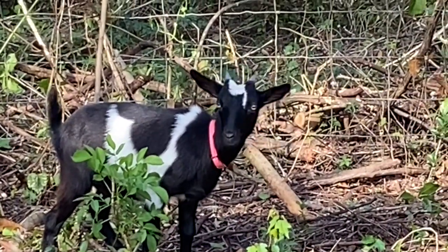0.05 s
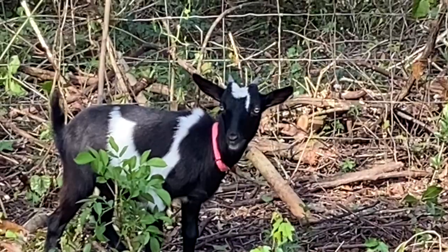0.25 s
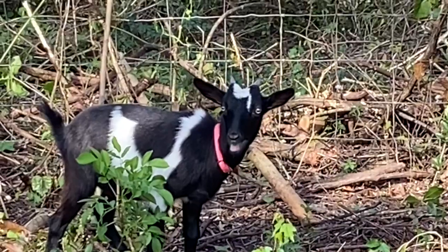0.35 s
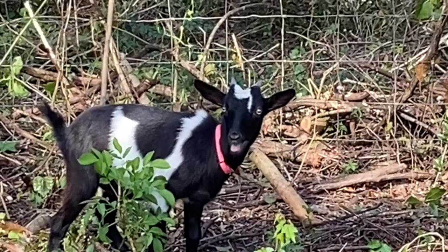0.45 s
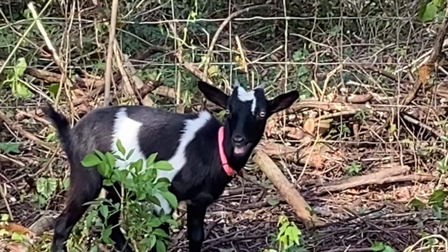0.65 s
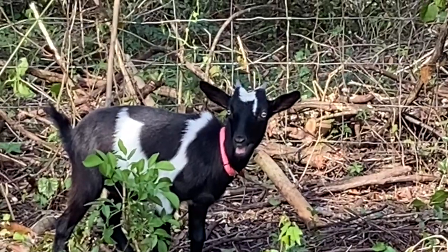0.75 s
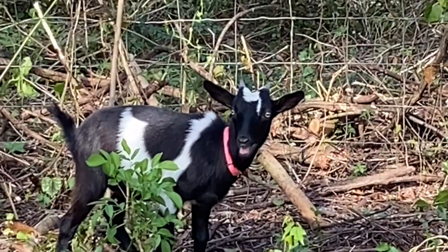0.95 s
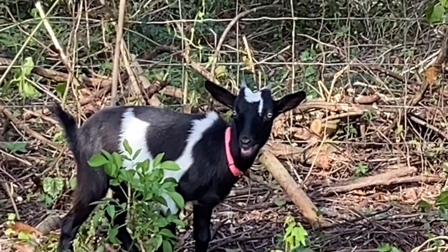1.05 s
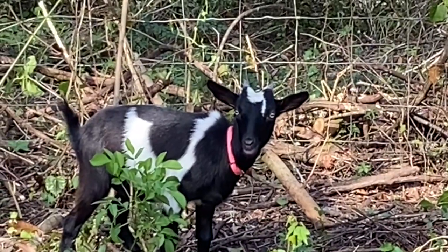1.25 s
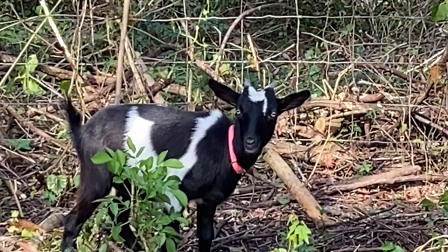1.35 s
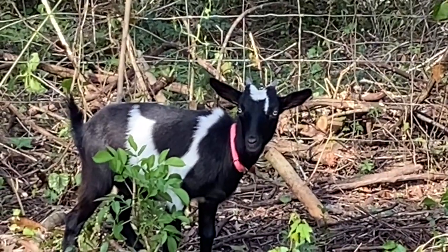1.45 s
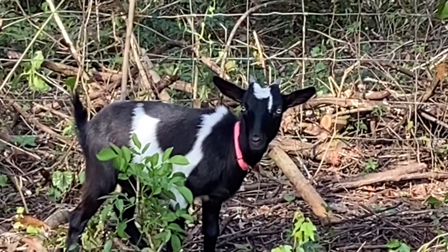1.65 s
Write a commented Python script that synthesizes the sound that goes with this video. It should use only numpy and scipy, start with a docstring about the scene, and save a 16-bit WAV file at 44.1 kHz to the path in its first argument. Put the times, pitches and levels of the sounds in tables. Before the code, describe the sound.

Faint low engine drone, hum and high airy hiss run throughout, the drone slowly rising in pitch. At about 0.2 s a small goat bleats, quickly sliding up to a bright, loud, open cry. From 0.5 s it quavers and rasps, catches lower near 0.7 s, swells again more closed and nasal, and drops away with a husky puff at 1.0 s. Dull faint outdoor echoes linger; a barely audible rustle comes around 1.2 s.

```python
"""Goat bleat outdoors

A small goat gives one long bleat: a bright cry that starts to quaver and rasp, catches, and ends lower
with a narrowed mouth. Fold pulses and chopped air noise drive a moving throat filter. Ground, sticks,
brush and far trees throw it back as delayed copies and noise echoes. Behind it an engine tone slowly
rises over hum and rumble, with a high shaped-noise hiss, thin tones and one faint rustle.
"""
import sys
import numpy as np
from scipy import signal
from scipy.fft import rfft, irfft
from scipy.io import wavfile
from scipy.ndimage import uniform_filter1d

SR = 44100
rng = np.random.default_rng(int(sys.argv[2]) if len(sys.argv) > 2 else 0)


def wav_out(sig):
    """Save sig, one row per channel (or a flat mono array), as 16-bit PCM at SR to the path in sys.argv[1]."""
    wavfile.write(sys.argv[1], SR, np.round(np.clip(np.atleast_2d(sig).T, -1, 1) * 32767).astype(np.int16))


N = 74970
T, HZ = np.arange(N) / SR, np.fft.rfftfreq(N, 1 / SR)
EDGE_HZ = 15900  # top of the band


def amp(db):
    """Decibels to gain."""
    return 10 ** (np.asarray(db) / 20)


def unit(x):
    """Scales to rms 1."""
    return x / np.sqrt(np.mean(x ** 2) + 1e-20)


def curve(table, axis=1):
    """One column of a time table, at every sample."""
    rows = np.array(table)
    return np.interp(T, rows[:, 0], rows[:, axis])


def spectrum(table, hz, axis=1):
    """One column of a frequency table, read on a log axis."""
    rows = np.array(table)
    return np.interp(np.log(hz + 1), np.log(rows[:, 0] + 1), rows[:, axis])


def filtered_noise(source, colour):
    """Shapes a noise source with a colour table."""
    return irfft(rfft(source) * amp(spectrum(colour, HZ)), N)


def noise(colour):
    """Noise of rms 1 with the given colour."""
    return unit(filtered_noise(rng.standard_normal(N), colour))


def wander(rate_hz):
    """Random motion of rms 1, mostly slower than the given rate."""
    return unit(irfft(rfft(rng.standard_normal(N)) / (1 + (HZ / rate_hz) ** 4), N))


def tone(hz):
    """A sine of rms 1 that follows hz, from a random phase."""
    cycles = np.cumsum(hz * np.ones(N)) / SR + rng.random()
    return np.sqrt(2) * np.sin(2 * np.pi * cycles)


def lowpass(hz):
    """Second-order filter that dulls everything above hz."""
    return signal.butter(2, hz, fs=SR, output="sos")


# Distant engine note: start_s, pitch_hz, level_db
ENGINE_NOTE = [(0, 167.5, -25.5), (.25, 170.7, -29), (.38, 174, -32.5), (.9, 178.3, -27),
               (1.7, 189.3, -34.5)]
# Hum under it: pitch_hz, level_db, sway (rms pitch drift in Hz, and rms level change as a share)
ENGINE_HUM = [(50.3, -46.5, 1), (143, -41.5, 0.096)]
# Colour of the low rumble: freq_hz, relative_db_per_hz
RUMBLE_COLOUR = [(20, -57), (52, 0), (95, 4), (175, 2.5), (215, -6.5), (400, -23), (1500, -100)]
RUMBLE_DB = -37.5


def engine():
    """One rising engine note over wavering hum and noise rumble, the same on both sides."""
    note = amp(curve(ENGINE_NOTE, axis=2)) * tone(curve(ENGINE_NOTE))
    note *= 1 + 0.14 * wander(4.8)
    hum = sum(amp(db) * tone(hz + sway * wander(15.0)) * (1 + sway * wander(3.5))
              for hz, db, sway in ENGINE_HUM)
    return note + hum + amp(RUMBLE_DB) * noise(RUMBLE_COLOUR)


# Colour of the hiss: freq_hz, relative_db_per_hz
HISS_COLOUR = [(2600, -12), (3400, -11), (4100, -2.5), (5500, 4.5), (6500, -5), (7400, -19), (8700, 3),
               (12000, -10.5), (13500, -20), (15500, -16)]
# Left-right likeness of the hiss: freq_hz, correlation (-1 to 1)
HISS_LIKENESS = [(3100, 0.69), (7000, -0.21)]
# Thin tones that come and go in it: loudest_s, pitch_hz, peak_level_db
THIN_TONES = [(.08, 4129, -46.5), (1.25, 3817, -51), (1.58, 4402, -47), (1.3, 8804, -49)]
HISS_DB, WHINE_S = -38, .26


def whines():
    """Faint thin tones, each with a bell-shaped swell and a slight random pitch wobble."""
    return sum(amp(db) * np.exp(-((T - s) / WHINE_S) ** 2) * tone(hz + 3 * wander(25.0))
               for s, hz, db in THIN_TONES)


def hiss():
    """Wide, high outdoor hiss: shaped noise partly shared between the sides, plus thin tones."""
    same = np.clip(spectrum(HISS_LIKENESS, HZ), -1, 1)
    left, other = noise(HISS_COLOUR), noise(HISS_COLOUR)
    right = irfft(same * rfft(left) + np.sqrt(1 - same ** 2) * rfft(other), N)
    return amp(HISS_DB) * np.array([left, right]) + np.array([whines(), whines()])


# Colour of the rustle: freq_hz, relative_db_per_hz
RUSTLE_COLOUR = [(800, -11), (1800, 0.5), (3500, -31)]
RUSTLE_S, RUSTLE_LENGTH_S, RUSTLE_DB = 1.228, 0.045, -46.5  # centre, half-width, level of the shared part


def rustle():
    """A faint mid-range rustle: shaped noise, partly separate on each side, that swells briefly."""
    swell = amp(RUSTLE_DB) * np.exp(-((T - RUSTLE_S) / RUSTLE_LENGTH_S) ** 2)
    sides = np.array([noise(RUSTLE_COLOUR), noise(RUSTLE_COLOUR)])
    return swell * (noise(RUSTLE_COLOUR) + .5 * sides)


FAR_DB, FAR_S, FAR_WIDTH_S, FAR_HZ = -36.5, 0.46, 0.063, 1102  # main echo; treble falls above FAR_HZ
WOODS_DB, WOODS_T60 = -35, 1.26  # faint lingering scatter; seconds to fall 60 dB


def far_echo(x):
    """Distant trees return the bleat late, blurred over many random paths, and dull."""
    cluster = amp(FAR_DB) * unit(np.exp(-((T - FAR_S) / FAR_WIDTH_S) ** 2))
    decay = np.exp(-np.log(1000) * T / WOODS_T60)
    linger = amp(WOODS_DB) * unit(decay * np.minimum(T / FAR_S, 1))
    scatter = rng.standard_normal(N) + .5 * rng.standard_normal((2, N))
    paths = np.hypot(cluster, linger) * scatter / np.sqrt(N)
    dull = signal.sosfilt(lowpass(FAR_HZ), x)
    return signal.fftconvolve(dull[None], paths, axes=1)[:, :N]


# The voice between the two microphone ports: freq_hz, left_lead_radians
PORT_LEAD = [(0, 0.5), (1400, 0.2), (2500, .5), (5400, 0.66), (6600, 3), (11000, 6), (15500, 13)]
# Decay of the brush tail: freq_hz, fall_by_60_db_s
BRUSH_DECAY = [(1200, 0.24), (12000, 0.2)]
BRUSH_DB, NEAR_DB, NEAR_S = -18, -7.5, 0.006  # echo gains; the near scatter swells until NEAR_S
SMEAR_S, SMEAR_HZ = 0.0016, 5020  # lag grows with frequency and reaches SMEAR_S at SMEAR_HZ


def outdoors(x):
    """Direct sound at two ports, quick scatter from nearby sticks, and a faint tail from the brush."""
    lead = np.exp(.5j * np.interp(HZ, *np.transpose(PORT_LEAD)))
    smear = np.exp(-1j * np.pi * SMEAR_S * HZ ** 2 / SMEAR_HZ)
    direct = irfft(rfft(x) * smear * np.array([lead, lead.conj()]), N)
    hz, t, grains = signal.stft(rng.standard_normal((2, N)), SR, nperseg=256)
    grains = grains * 1000 ** (-t / spectrum(BRUSH_DECAY, hz)[:, None])
    tail = signal.istft(grains, SR, nperseg=256)[1][:, :N]
    near = rng.standard_normal(N) * T / NEAR_S * np.exp(-T / NEAR_S)
    echoes = (amp(BRUSH_DB) * unit(tail) + amp(NEAR_DB) * unit(near)) / np.sqrt(N)
    return direct + signal.fftconvolve(direct, echoes, axes=1)[:, :N]


GROUND_S, GROUND_SHARE, GROUND_HZ = 0.0021, 0.082, 4780  # delay, gain, treble limit


def ground(x):
    """Soft ground adds a late, inverted, duller copy, so harmonics swell and dip as pitch moves."""
    echo = GROUND_SHARE * np.exp(-2j * np.pi * HZ * GROUND_S) / (1 + (HZ / GROUND_HZ) ** 2)
    return irfft(rfft(x) * (1 - echo), N)


# Colour of the closing puff: freq_hz, relative_db_per_hz
AIR_COLOUR = [(600, -32.5), (900, -9), (1200, 4), (1600, -1.5), (4000, -21)]
FADE_S, AIR_DB, AIR_RISE_S = 0.044, -36.5, 0.018  # the air outlasts the folds


def last_air():
    """A short husky puff of noise rises into the bleat's end and fades as the folds stop."""
    since = T - BLEAT_LINE[-1][0]
    return amp(AIR_DB) * np.exp(-np.maximum(since / FADE_S, -since / AIR_RISE_S)) * noise(AIR_COLOUR)


# Throat colour: freq_hz, mouth_narrow_db, half_open_db, wide_db
THROAT_COLOUR = [(523, -42, -41, -47.5), (740, -31.5, -23.5, -36.5), (1007.5, -17.5, -14.5, -22),
                 (1038, -28, -11, -7.5), (1305, -10, -20.5, -0.5), (1485, -19.5, -9.5, -23),
                 (1598, -30, -22, -42), (1873, -30, -29, -52), (2175, -20.5, -19.5, -37),
                 (2445, -32, -25.5, -21.5), (2733, -34.5, -23.5, -32.5), (3060, -19.5, -11.5, -7.5),
                 (3340, -27.5, -42, -45), (3330, -29, -22, -25), (4360, -26.5, -24, -14),
                 (4930, -26, -33.5, -18.5), (5336, -23.5, -21.5, -10), (5920, -30, -27, -37.5),
                 (6610, -26, -19.5, -20.5), (7400, -56, -76, -59), (8005, -34.5, -28, -36),
                 (11070, -45.5, -43, -33.5), (14400, -55.5, -50, -51)]


def throat(x, axis):
    """Causal (minimum-phase) resonance for one mouth shape."""
    log_gain = np.log(amp(spectrum(THROAT_COLOUR, abs(np.fft.fftfreq(4096, 1 / SR)), axis=axis)))
    ring = np.fft.ifft(np.exp(np.conj(signal.hilbert(log_gain)))).real
    return signal.fftconvolve(x, ring[:len(ring) // 2])[:N]


# Melody of the bleat: start_s, centre_pitch_hz, level_db (before VOICE_DB)
BLEAT_LINE = [(0.185, 353, -41.5), (0.204, 402.4, -40), (0.223, 452.7, -20.5), (0.26, 495.8, -15),
              (0.29, 513.2, -9.5), (0.314, 531.2, -10.5), (0.34, 510, -9), (0.36, 515.2, -9.5),
              (0.378, 533.1, -10.5), (0.405, 507.5, -10), (0.452, 518.6, -11), (0.474, 491.4, -13.5),
              (0.52, 515.3, -12.5), (0.538, 473.2, -16), (0.57, 480, -16), (0.594, 515.5, -12),
              (0.615, 471.7, -18), (0.629, 465, -21.5), (0.648, 462.3, -15.5), (0.671, 509, -15.5),
              (0.688, 446.8, -16.5), (0.711, 459.5, -25.5), (0.731, 405, -17.5), (0.752, 397.5, -19),
              (0.778, 411.4, -19), (0.815, 445, -14), (0.85, 460.1, -16.5), (0.905, 477.2, -18),
              (0.925, 449.7, -17.5), (0.948, 460.8, -23.5), (0.975, 431.2, -26.5), (0.998, 327.5, -34)]
# Mouth opening: start_s, mouth (0 narrow, 1 half open, 2 wide)
MOUTH_SHAPE = [(.2, 0.83), (.25, 1.494), (.29, 1.51), (.44, 1.337), (.6, 1.13), (.68, 0.16), (.73, 0.018),
               (.97, 0.11)]
# Roughness of the voice: start_s, roughness (0 to 1)
ROUGHNESS = [(.22, .08), (.28, .04), (.5, .06), (.56, .18), (.715, .27), (.75, .13), (.87, .08), (.98, .12)]
# Colour of the raspy air: freq_hz, gain_db
RASP_COLOUR = [(700, -18), (3000, -15), (6000, -3), (11000, 11)]
VOICE_DB, ATTACK_S, RELEASE_S = 1.5, .01, .008
JITTER, JITTER_HZ, SHIMMER = 0.022, 118, 0.19  # rms pitch and level unsteadiness at full roughness
FLUTTER, FLUTTER_HZ, FLUTTER_SPREAD = .04, 105, 0.1503  # rms pitch share at full roughness, rate, rate spread
GRAIN_DB, GRAIN_HZ = 9, 35  # overtone swell at full roughness, and its rate
PUFF = 0.71  # how deeply the folds chop the air noise
DOUBLING, DOUBLING_S, DOUBLING_WIDTH_S = 0.021, 0.45, 0.12  # alternating strong and weak pulses
SOFT_DB, DULL_HZ = -38, 1650  # below this melody level the voice loses its treble


def fold_pulses(turn, hz, rough):
    """Sums the folds' overtones; roughness makes each swell and sink on its own, the high ones most."""
    grain_db = GRAIN_DB * np.sqrt(rough)
    folds = 0
    for k in range(1, 42):
        swell = amp(grain_db * min(k / 10, 1) * wander(GRAIN_HZ))
        folds = folds + np.cos(k * turn) * (k * hz < EDGE_HZ) * swell
    doubling = DOUBLING * np.exp(-((T - DOUBLING_S) / DOUBLING_WIDTH_S) ** 2)
    return unit(folds) * (1 + SHIMMER * rough * wander(JITTER_HZ) + doubling * np.cos(turn / 2))


def goat():
    """Fold pulses and puffs of air pass a throat that follows the mouth."""
    rough, mouth = np.clip(curve(ROUGHNESS), 0, 1), np.clip(curve(MOUTH_SHAPE), 0, 2)
    level_db = curve(BLEAT_LINE, axis=2)

    # strained folds jitter and flutter in pitch
    flutter = FLUTTER * tone(FLUTTER_HZ * (1 + FLUTTER_SPREAD * wander(20)))
    hz = curve(BLEAT_LINE) * (1 + rough * (JITTER * wander(JITTER_HZ) + flutter))
    turn = 2 * np.pi * np.cumsum(hz) / SR
    folds = fold_pulses(turn, hz, rough)
    air = filtered_noise(rng.standard_normal(N) * (1 + PUFF * np.cos(turn)), RASP_COLOUR)

    # crossfade the three mouth shapes
    voice = sum(throat(folds + rough * air, axis=k + 1) * np.maximum(1 - abs(mouth - k), 0)
                for k in range(3))
    weak = 1 / (1 + amp(level_db - SOFT_DB) ** 2)
    dull = signal.sosfiltfilt(lowpass(DULL_HZ), voice)
    voice = ground((1 - weak) * voice + weak * dull)

    # even out the loudness, then impose the level line
    voice /= np.sqrt(abs(uniform_filter1d(voice ** 2, size=900)) + 1e-12)
    after = np.maximum(T - BLEAT_LINE[-1][0], 0)
    gate = np.clip((T - BLEAT_LINE[0][0]) / ATTACK_S, 0, 1) * np.exp(-after / RELEASE_S)
    return voice * gate * amp(level_db + VOICE_DB)


def scene():
    """The goat and its echoes in front of the far engine, the hiss and a rustle."""
    cry = goat() + last_air()
    return engine() + hiss() + rustle() + far_echo(cry) + outdoors(cry)


def record(dry):
    """Full-scale limit, then the band limit."""
    band = signal.firwin(511, EDGE_HZ, window=("kaiser", 9), fs=SR)
    return signal.oaconvolve(np.clip(dry, -1, 1), band[None], "same")


dry = scene()
out = record(dry)
wav_out(out)
```